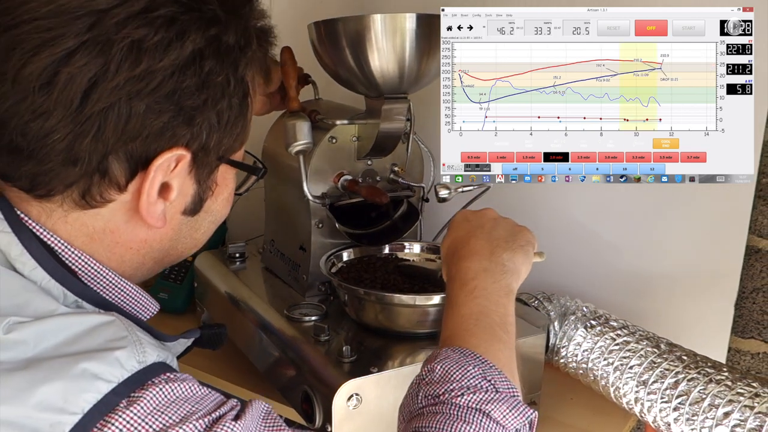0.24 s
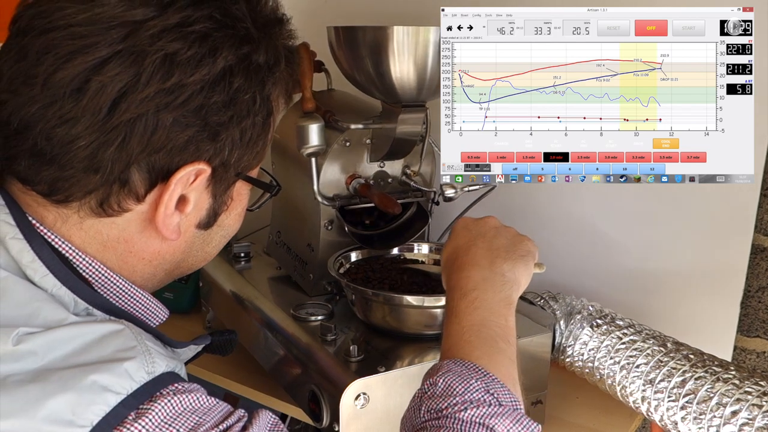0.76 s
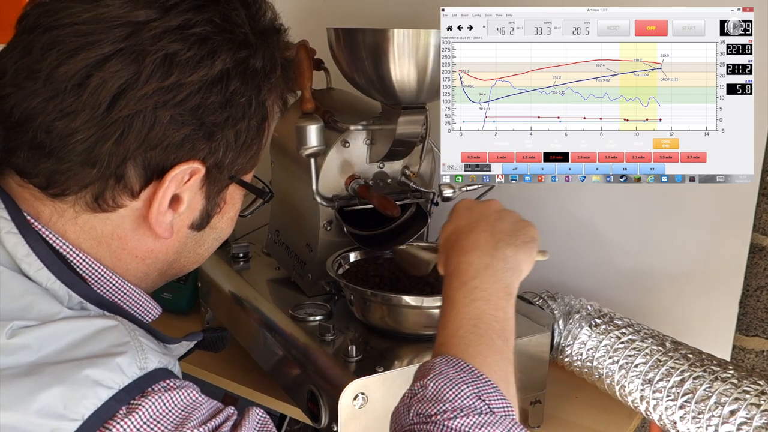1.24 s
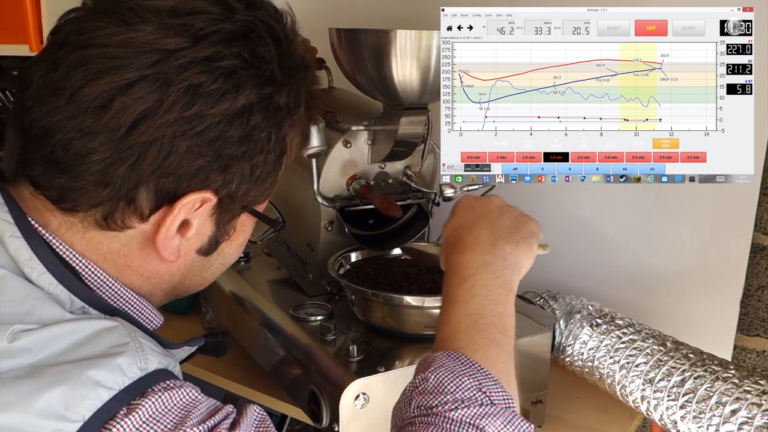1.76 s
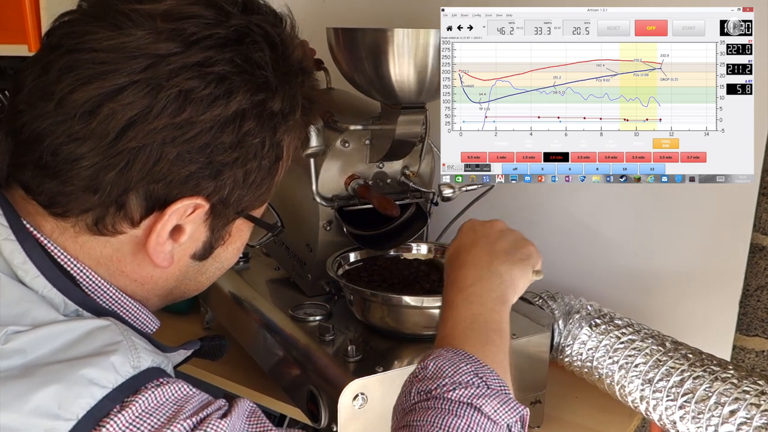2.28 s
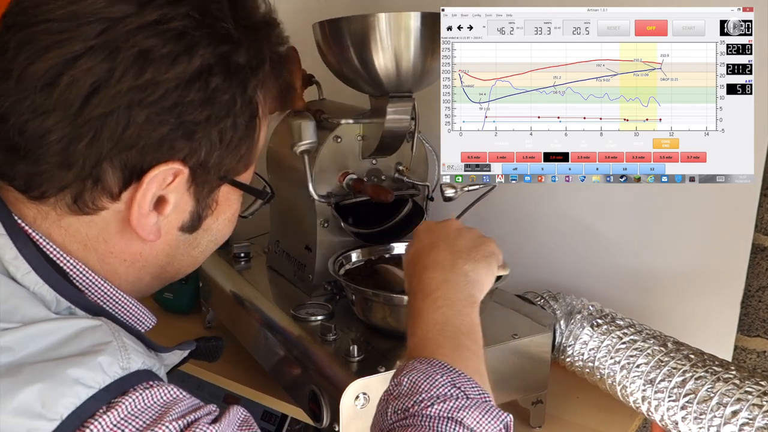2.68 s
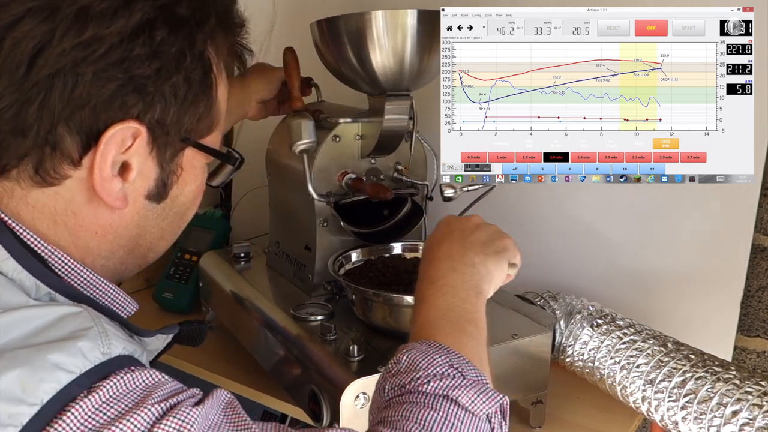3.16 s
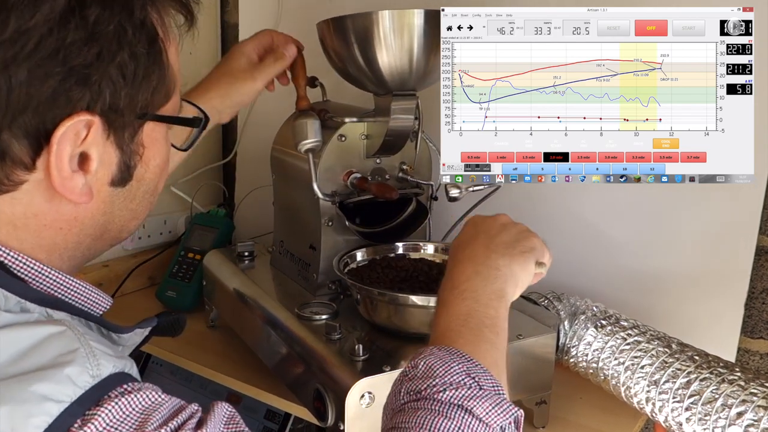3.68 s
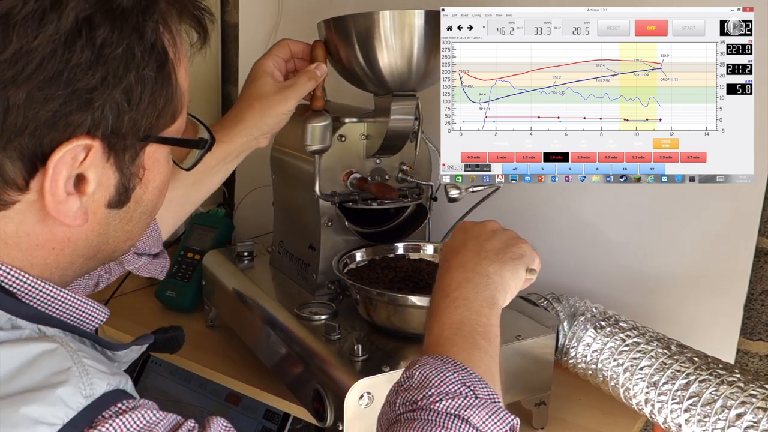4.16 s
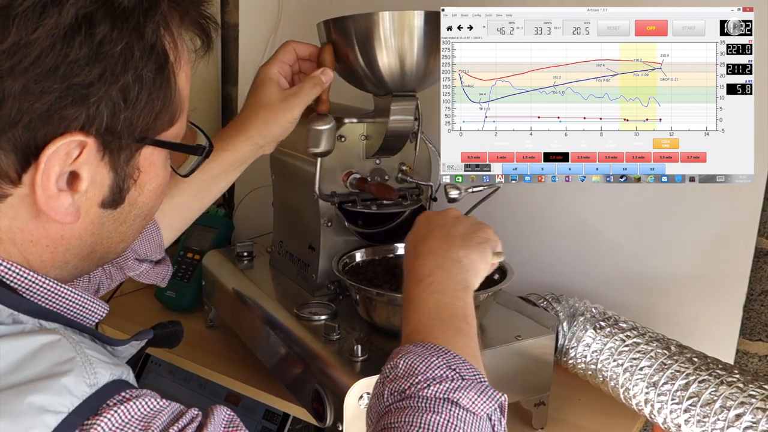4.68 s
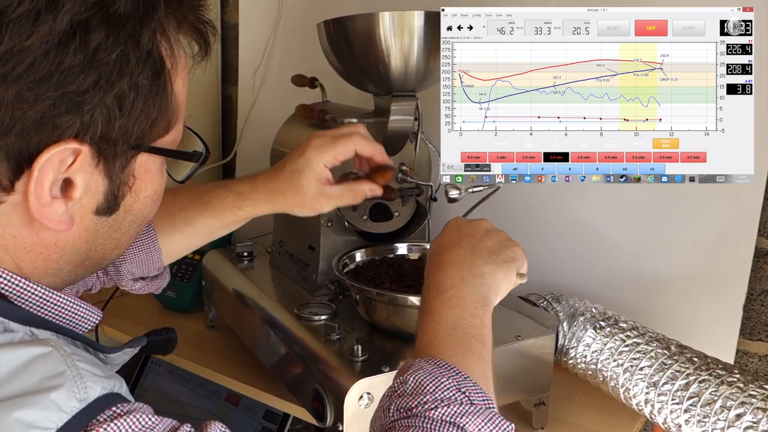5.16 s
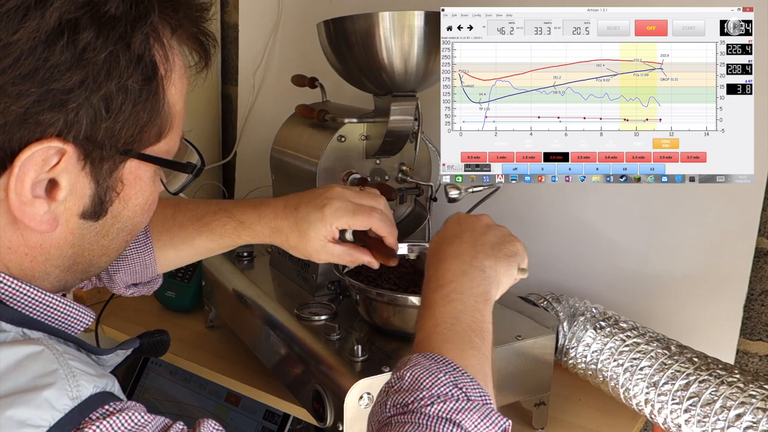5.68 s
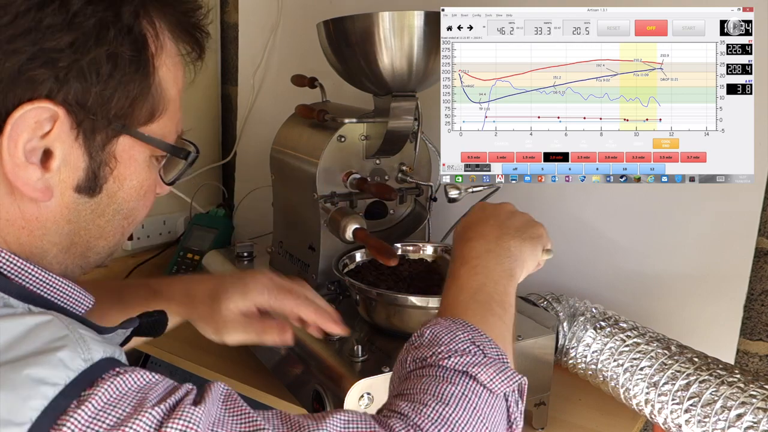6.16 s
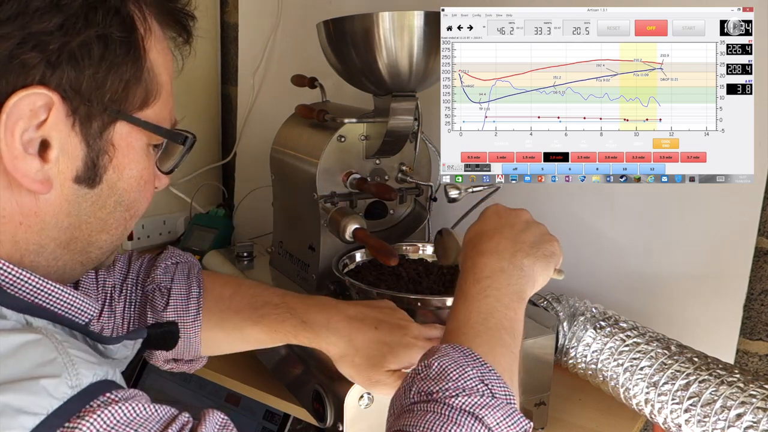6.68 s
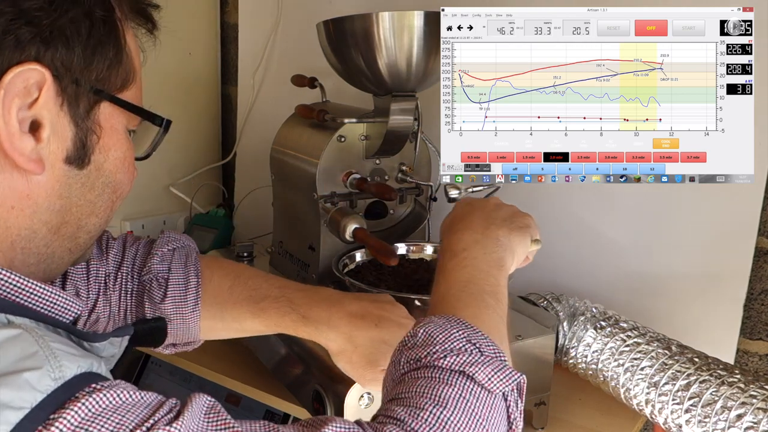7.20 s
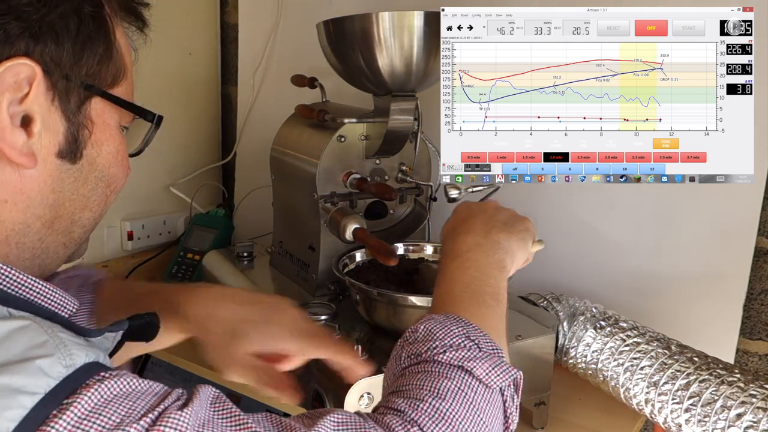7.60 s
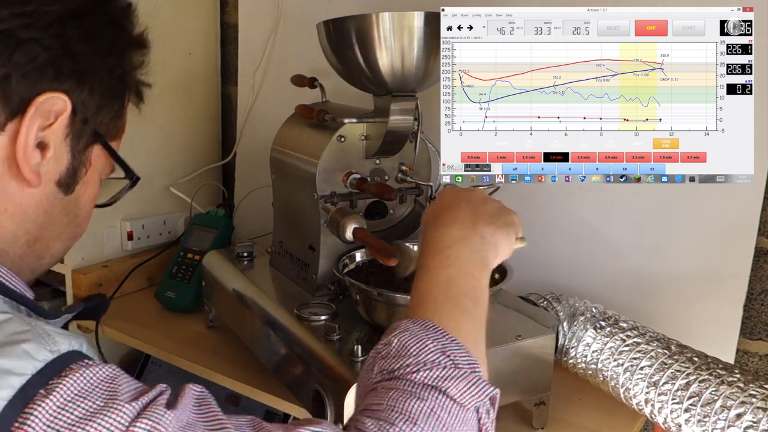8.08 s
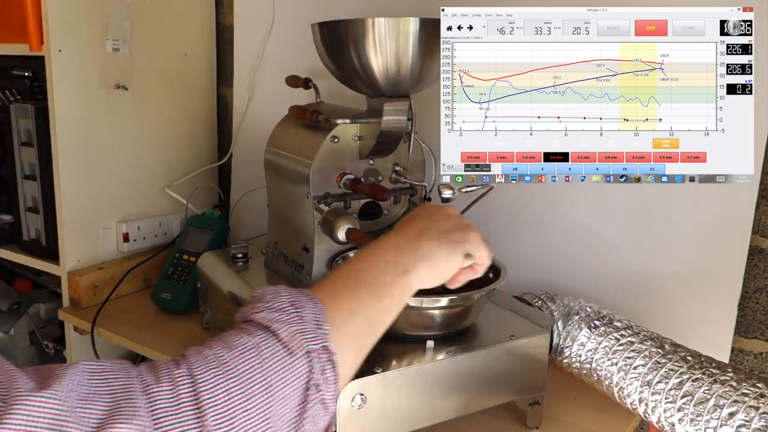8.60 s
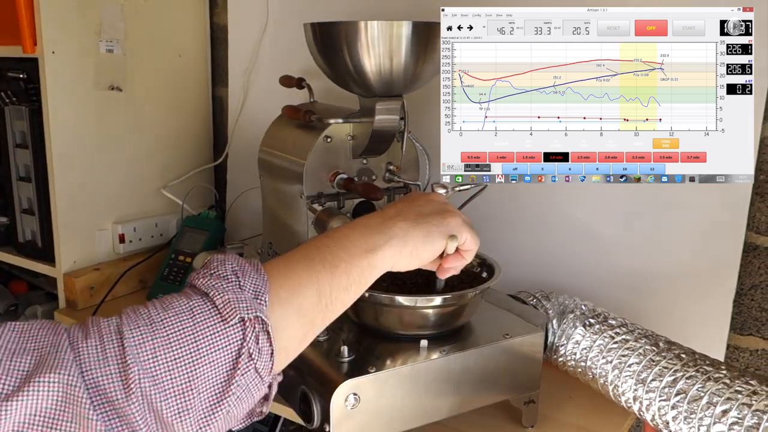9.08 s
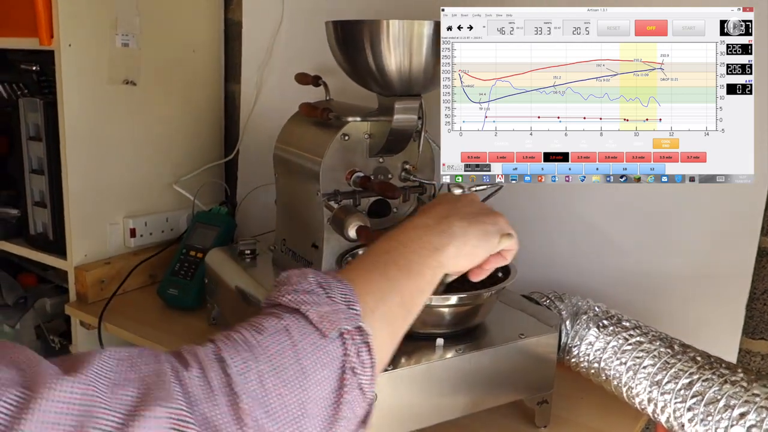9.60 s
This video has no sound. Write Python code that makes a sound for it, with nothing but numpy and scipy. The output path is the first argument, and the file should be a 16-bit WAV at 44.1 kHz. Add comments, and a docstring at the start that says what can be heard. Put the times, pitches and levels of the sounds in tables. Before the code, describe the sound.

Fans whine and rush steadily while the last roasted beans clink in a steel drum, then hand strokes swish beans around a ringing metal bowl.

```python
"""Fans whine and rush throughout, as noise through duct resonances under fluttering tones.
At first the last roasted beans rattle and clink in a small roaster's steel drum, as short ringing impacts.
Hand strokes then stir beans in the steel cooling bowl: dry hiss, ringing wall hits and sliding trickles.
Ticks, scuffs, knocks, bumps and switch clicks are shaped noise bursts; a handle chirps once.
All but the fans is answered by a small room."""
import sys
import numpy as np
from scipy import signal
from scipy.fft import rfft, irfft, next_fast_len
from scipy.io import wavfile
from scipy.ndimage import map_coordinates

SR = 44100
rng = np.random.default_rng(int(sys.argv[2]) if len(sys.argv) > 2 else 0)


def output_pcm(signal):
    """Save a mono or channel-first signal as 16-bit PCM at the path in sys.argv[1].

    Samples are clipped to [-1, 1] before scaling.
    """
    pcm = np.clip(np.atleast_2d(signal).T, -1, 1) * 32767
    wavfile.write(sys.argv[1], SR, np.round(pcm).astype(np.int16))


N = 433944


def amp(db):
    """Decibels to gain."""
    return np.exp(np.asarray(db) * (np.log(10) / 20))


def unit(x):
    """Scale to rms 1."""
    return x / np.sqrt(np.mean(x ** 2) + 1e-20)


def clock():
    """Time of each sample in seconds."""
    return np.arange(N) / SR


def along(points, hz):
    """(Hz, value) points read on a log frequency axis."""
    f, v = np.transpose(points)
    return np.interp(np.log(hz + 1), np.log(f + 1), v)


def curves(rows):
    """One value per sample for each column after the time."""
    s, *cols = np.transpose(rows)
    return [np.interp(clock(), s, c) for c in cols]


def wobble(rate):
    """Smooth random curve, rate knots a second."""
    knots = rng.standard_normal(int(N * rate / SR) + 4)
    coarse = clock()[::64]
    return np.interp(clock(), coarse, map_coordinates(knots, [coarse * rate]))


def during(start, end, fade):
    """1 between two times, 0 outside, with soft edges."""
    t = clock()
    return np.clip(np.minimum(t - start, end - t) / fade + .5, 0, 1)


def swell(s, rise, fall):
    """Peak at time s, 20 dB lower one rise before and one fall after."""
    first, last = np.clip([int((s - 3 * rise) * SR), int((s + 3 * fall) * SR)], 0, N)
    t = np.arange(first, last) / SR - s
    out = np.zeros(N)
    out[first:last] = amp(-20 * np.maximum(-t / rise, t / fall))
    return out


def filtered(x, response):
    """x times a response of frequency."""
    m = 2 * next_fast_len(N // 2 + SR // 8)
    return irfft(rfft(x, m) * response(np.fft.rfftfreq(m, 1 / SR)), m)[..., :N]


def body(x, spectrum, modes=(), size=8192):
    """Causal (minimum-phase) body with a broad colour and resonances; white input keeps its power."""
    hz = np.fft.rfftfreq(size, 1 / SR)
    peaks = sum((amp(2 * db) - 1) / (1 + (2 * (hz - f) / w) ** 2) ** 2 for f, w, db in modes)
    gain = amp(along(spectrum, hz)) * np.sqrt(np.maximum(1 + peaks, 1e-3))
    cepstrum = irfft(np.log(gain))
    cepstrum[1:size // 2] *= 2
    cepstrum[size // 2 + 1:] = 0
    ring = irfft(np.exp(rfft(cepstrum)))
    return signal.oaconvolve(x, ring[None] / np.linalg.norm(ring), axes=1)[:, :N]


def puffs(level, width):
    """Partly alike stereo noise following a level curve."""
    mid, side = rng.standard_normal((2, N))
    return level * unit(np.array([mid + width * side, mid - width * side]))


def impacts(level, rate, scatter_db, t60, spread, top_hz=11400):
    """Stereo bean impacts along a level curve: a higher level gives more and stronger ones."""
    # rate is impacts per second at -30 dB
    density = np.clip(rate * level / amp(-30), 20, 9000) / SR
    at = np.flatnonzero(rng.random(N) < density)
    force, side, lag = rng.standard_normal((len(at), 3)).T
    hz = rng.uniform(800, top_hz, len(at))
    # each impact is a short ring at its own pitch
    t = np.arange(int(min(t60, .06) * SR * 2 / 3)) / SR
    ring = amp(-60 * t / t60) * np.sin(2 * np.pi * hz[:, None] * t)
    force = unit(amp(scatter_db * np.clip(force, -2, 2))) * level[at] / np.sqrt(density[at])
    sign = rng.choice([-1, 1], len(at))
    ring *= (force * sign / np.linalg.norm(ring, axis=1))[:, None]
    # each landing place gives its own delay (samples) and strength per ear
    out = []
    for ear in (-1, 1):
        delay = np.rint(ear * (spread * lag - .2)).astype(int)
        start = np.maximum(at + delay, 0)
        index = (start[:, None] + np.arange(len(t))).ravel()
        heard = (ring * amp(ear * side)[:, None]).ravel()
        out.append(np.bincount(index, heard, N)[:N])
    return np.array(out)


def add(out, s, hz, db, t60):
    """Add one ringing steel mode to out, struck at time s."""
    rest = out[int(s * SR):][:SR // 3]
    t = np.arange(len(rest)) / SR
    onset = 1 - np.exp(-t / 0.0011)
    rest += amp(db - 60 * t / t60) * onset * np.sin(2 * np.pi * hz * t)


def blade_tone(hz, db):
    """A fan's tone; turbulence makes its phase and level flutter."""
    phase = 2 * np.pi * np.cumsum(hz + 1.2 * wobble(2.5)) / SR + .25 * wobble(18)
    return amp(db + 1.45 * wobble(11)) * np.sqrt(2) * np.sin(phase)


# Blade tones before load, hunting and flutter: main in Hz, second in Hz.
BLADE_TONES_HZ = (736.5, 1338.5)
# Second tone's mean level. Each row: time in seconds, level in dB.
SECOND_TONE_LEVELS = [(0, -46.5), (1.3, -39.5), (2.8, -43), (4.2, -40), (5.4, -45.5), (6.2, -38),
                      (7.3, -39.5), (8.3, -39), (9.84, -39)]
# Weaker motor and blade tones. Each row: frequency in Hz, rms level in dB, flutter in knots per second.
MOTOR_HUMS = [(105, -71, 18), (333, -62, 10), (419.8, -52.5, 8), (667.5, -49, 9), (1141, -54, 14),
              (1467, -46, 14), (2207, -55, 7), (2396, -57, 12)]
# Faint thin whistle: start in seconds, end in seconds, mean frequency in Hz, mean peak level in dB.
WHISTLE_TONE = (1.9, 2.5, 6665, -48)
# Colour of the rush. Each row: frequency in Hz, relative level in dB per Hz.
AIR_SPECTRUM = [(20, -40), (75, -36), (170, -20.5), (300, -11), (540, -4.5), (640, 2), (950, -2.5),
                (1450, 0.5), (1720, -5.5), (2100, -1), (3500, -2.5), (6000, -7.5), (8500, -14.5),
                (11000, -16)]
# Duct resonances. Each row: frequency in Hz, width in Hz, lift in dB.
DUCT_RESONANCES = [(172.6, 26.5, 10.5), (613, 25, 3.5), (770, 101, 6.5), (950, 70, -1), (1087, 220, 6),
                   (1522, 122, 6), (2480, 41, 2.5), (2590, 33, 7.5), (3256, 60, 6.5)]
# Left-right likeness of the air noise. Each row: frequency in Hz, correlation (no unit).
AIR_LIKENESS = [(60, 0.63), (130, 1), (270, 0.95), (580, 0.95), (1230, 0.91), (2600, 0.65), (5540, 0.43),
                (11800, 0.24)]
AIR_DB, AIR_RISE_DB_PER_S = -29.5, 0.0855
# the main tone gets louder, and both tones rise in pitch, when the fan takes more load
MAIN_DB, LOAD_STEP_DB, LOAD_STEP_HZ, LOAD_FROM_S, LOAD_RAMP_S = -37.5, 3.5, 2, 7.0, 0.86
# the second tone hunts by +-HUNT_HZ and +-HUNT_DB, louder at the top
HUNT_PERIOD_S, HUNT_TOP_S, HUNT_HZ, HUNT_DB = .984, 1.3, 5.1, 2


def fans():
    """Air rushes through the duct under a steady blade tone, a hunting one, motor hums and a whistle."""
    def response(hz):
        turn = np.arccos(np.clip(along(AIR_LIKENESS, hz), -1, 1)) / 2
        return np.array([np.cos(turn), np.sin(turn)])

    mid, side = filtered(rng.standard_normal((2, N)), response)
    air_level = amp(AIR_DB + AIR_RISE_DB_PER_S * clock() + 0.99 * wobble(1.436))
    rush = unit(body(np.array([mid + side, mid - side]), AIR_SPECTRUM, DUCT_RESONANCES))
    load = np.clip((clock() - LOAD_FROM_S) / LOAD_RAMP_S, 0, 1)
    hunt = np.cos(2 * np.pi * (clock() - HUNT_TOP_S) / HUNT_PERIOD_S)
    main_hz, second_hz = [hz + LOAD_STEP_HZ * load for hz in BLADE_TONES_HZ]
    second_db = curves(SECOND_TONE_LEVELS)[0] + HUNT_DB * hunt
    tones = blade_tone(main_hz, MAIN_DB + LOAD_STEP_DB * load)
    tones += blade_tone(second_hz + HUNT_HZ * hunt, second_db)
    for hz, db, flutter in MOTOR_HUMS:
        phase = 2 * np.pi * hz * clock()
        hum = (1 + wobble(flutter)) * np.sin(phase) + wobble(flutter) * np.cos(phase)
        tones += amp(db) * unit(hum)
    start, end, hz, db = WHISTLE_TONE
    whistle_level = during(start, end, fade=.2) * amp(db + 2 * wobble(14))
    tones += whistle_level * np.sin(2 * np.pi * np.cumsum(hz + 6 * wobble(17)) / SR)
    return air_level * rush + tones


POUR_DB, POUR_ENDS_S, POUR_FADE_DB_PER_S, POUR_CLUMP_DB = -29.5, .8, 21.5, 1.78


def pour_db(t):
    """The flow of beans out of the drum holds, then dies away."""
    return POUR_DB - POUR_FADE_DB_PER_S * np.maximum(t - POUR_ENDS_S, 0)


# Drum colour. Each row: frequency in Hz, relative level in dB per Hz.
DRUM_SPECTRUM = [(300, -72), (1700, -3.5), (2500, -2.5), (5000, 1), (8000, -1.5), (11000, 2)]
# Drum resonances, lowest first. Each row: frequency in Hz, width in Hz, lift in dB.
DRUM_RESONANCES = [(2390, 90, 12), (2620, 60, 8), (2850, 60, 8), (3970, 90, 3), (4940, 260, 5),
                   (5980, 60, 7), (6970, 60, 6), (7970, 80, 5)]


def drum():
    """The last beans strike the steel drum one by one: dry rattle and longer, lower clinks."""
    level = amp(pour_db(clock()) + POUR_CLUMP_DB * wobble(16))
    rattle = impacts(amp(-1.5) * level, rate=1400, scatter_db=-0.5, t60=0.00057, spread=0.56)
    clinks = impacts(amp(-3.5) * level, rate=480, scatter_db=3, t60=.04, spread=.6, top_hz=9000)
    return body(rattle + clinks, DRUM_SPECTRUM, DRUM_RESONANCES)


# Heavy clumps in the drum. Each row: time in seconds, level in dB before mode weights and scatter.
DRUM_CLANGS = [(.066, -23.5), (.225, -26), (.487, -27), (.6, -30), (.84, -30), (1.156, -30)]
CLANG_T60_S = 0.21
# PING_DB is relative to the pour, for the weakest hit on the lowest mode; higher modes are weaker
PINGS_PER_S, PING_DB, PING_T60_S, PING_TILT_DB_PER_OCTAVE = 34, -6, .1, -2


def pings(count=52, order=3):
    """Single beans catch one drum mode squarely; heavy clumps ring its lowest modes together."""
    out = np.zeros(N)
    lowest_hz, _, lowest_db = DRUM_RESONANCES[0]
    for k, (when, which, detune, force) in enumerate(rng.random((count, 4))):
        s = (k + when) / PINGS_PER_S
        hz, width, _ = DRUM_RESONANCES[int(which * len(DRUM_RESONANCES))]
        tilt_db = PING_TILT_DB_PER_OCTAVE * np.log2(hz / lowest_hz)
        db = pour_db(s) + PING_DB + 10 * force + tilt_db
        add(out, s, hz + 2 * width * (detune - .5), db, PING_T60_S)
    for s, db in DRUM_CLANGS:
        for hz, width, lift_db in DRUM_RESONANCES[:order]:
            mode_hz = hz + width * rng.normal(0, 0.13)
            mode_db = db + 1.6 * (lift_db - lowest_db) + rng.normal(0, 1.5)
            add(out, s, mode_hz, mode_db, CLANG_T60_S)
    return out


# Spoon sweeps. Each row: peak in seconds, level in dB, rise in seconds, share thrown on the wall (0-1).
SPOON_STROKES = [(1.1, -28.5, 0.14, .2), (1.605, -27, 0.049, .1), (1.93, -22.5, 0.065, 0.27),
                 (2.285, -19.5, 0.036, 0.93), (2.70, -28, .14, 0.26), (2.995, -14.5, 0.058, 0.81),
                 (3.16, -27.5, 0.14, 0.56), (3.44, -21.5, .075, 0.37), (3.682, -14, .027, 0.96),
                 (4.283, -24.5, 0.078, 0.83), (4.4, -29, .1, 0.43), (4.76, -30, .09, 0.21),
                 (4.96, -14.5, .045, .95), (5.505, -19, .17, .9), (5.642, -23.5, 0.059, 0.08),
                 (6.166, -18, .04, 0.82), (7.035, -29, .05, .8), (7.15, -28.5, .17, .15),
                 (7.635, -26, 0.13, 0.52), (7.765, -26, 0.1, 0.57), (7.88, -22, 0.069, .9),
                 (7.93, -25, .04, .4), (8.275, -25, .17, 0.31), (8.548, -16.5, 0.048, 0.91),
                 (9.11, -29.5, 0.16, 0.66), (9.28, -27.5, .17, 0.13), (9.62, -27, .13, 0.38)]
# The spoon lies still. Each row: start in seconds, end in seconds.
SPOON_RESTS = [(3.9, 4.2), (6.3, 6.95)]
# Colour of bean on bean. Each row: frequency in Hz, relative level in dB per Hz.
BEAN_SPECTRUM = [(200, -37), (1000, -15.5), (2000, 1.5), (4500, 8), (8000, 7), (11000, 0.5)]
# Colour of bean on bowl wall. Each row: frequency in Hz, relative level in dB per Hz.
WALL_SPECTRUM = [(300, -56), (1600, -11), (3000, -12.5), (4400, -7.5), (6200, -2), (7200, 6.5), (8400, 2),
                 (11000, -6.5)]
# Bowl resonances. Each row: frequency in Hz, width in Hz, lift in dB.
BOWL_RESONANCES = [(1850, 90, 9), (2500, 120, 6), (3460, 100, 16.5), (4100, 70, 16), (4690, 90, 10),
                   (4945, 85, 15), (5640, 170, 10.5), (6520, 190, 4.5), (7010, 110, 4), (7340, 150, 6),
                   (7710, 130, 5), (8700, 110, 5), (10100, 100, 5)]
SETTLE_S, SETTLE_PER_RISE = .07, .25  # thrown beans fall 20 dB in this time, longer after a slow sweep
TRICKLE_DB, TRICKLE_S = -13, .28  # beans slide back down the wall: level re the throw, time to fall 20 dB
SHUFFLE_DB, SHUFFLE_SWING_DB = -42.5, 3  # beans shift round the moving spoon between sweeps
CRACKLE_DB = -49  # stray beans snap against each other while the spoon moves


def stirring():
    """Beans rub on each other with a dry hiss, pelt the bowl's wall, which rings, and trickle back."""
    moving = 1 - sum(during(start, end, fade=.1) for start, end in SPOON_RESTS)
    # powers
    on_wall = np.zeros(N)
    on_beans = (moving * amp(SHUFFLE_DB + SHUFFLE_SWING_DB * wobble(5))) ** 2
    for s, db, rise, share in SPOON_STROKES:
        share = np.clip(share, 0, 1)
        throw = (amp(db) * swell(s, rise, SETTLE_S + SETTLE_PER_RISE * rise)) ** 2
        trickle = share * (amp(db + TRICKLE_DB) * swell(s, rise, TRICKLE_S)) ** 2
        on_wall += share * throw + trickle / 2
        on_beans += (1 - share) * throw + trickle / 2
    clumps = amp(.9 * wobble(170))
    hiss = impacts(np.sqrt(on_beans) * clumps, rate=3200, scatter_db=-1.5, t60=0.00084, spread=0.71)
    snaps = impacts(amp(CRACKLE_DB) * moving, rate=250, scatter_db=6.5, t60=0.0036, spread=0.65)
    steel = impacts(np.sqrt(on_wall) * clumps, rate=1500, scatter_db=3.0, t60=0.0044, spread=.55)
    among_beans = amp(-1.0) * body(hiss + snaps, BEAN_SPECTRUM)
    return among_beans + amp(-2.64) * body(steel, WALL_SPECTRUM, BOWL_RESONANCES)


# Sharpest single contacts of beans and spoon. Each row: time in seconds, level in dB before path gains.
SHARP_TICKS = [(0.068, -18), (.4045, -20), (.4843, -18), (.529, -20.5), (1.1537, -22), (2.243, -18),
               (3.6524, -13.5), (3.739, -18), (3.831, -21.5), (5.0375, -20), (7.525, -21.5), (9.012, -22),
               (9.158, -22.5), (9.8059, -24)]


def ticks():
    """A hard contact sets off a few milliseconds of chatter, among the beans and on the wall."""
    level = sum(amp(db) * swell(s + 0.00045, 0.00095, 0.016) for s, db in SHARP_TICKS)
    among_beans = amp(-3) * body(puffs(level, width=0.49), BEAN_SPECTRUM)
    on_wall = amp(-2.5) * body(puffs(level, width=0.59), WALL_SPECTRUM, BOWL_RESONANCES)
    return among_beans + on_wall


# RING_DB is re the stroke, before wall share, mode weight and scatter
RING_DB, RING_T60_S, RING_SCATTER_S = -9, .14, .012


def bowl_ring():
    """Each throw of beans strikes the bowl's clearest modes, which ring on briefly."""
    out = np.zeros(N)
    strongest_db = max(lift_db for _, _, lift_db in BOWL_RESONANCES)
    for s, db, _, share in SPOON_STROKES:
        share_db = 20 * np.log10(np.clip(share, .01, 1))
        for hz, width, lift_db in BOWL_RESONANCES[2:7]:
            late, detune, force = rng.standard_normal(3)
            mode_db = db + RING_DB + share_db + (lift_db - strongest_db) / 2 + 2 * force
            add(out, s + RING_SCATTER_S * late, hz + 0.17 * width * detune, mode_db, RING_T60_S)
    return out


# Sleeve and hand scuffs on the housing. Each row: peak in seconds, level in dB,
# rise over 20 dB in seconds, fall over 20 dB in seconds.
HOUSING_SCUFFS = [(2.80, -25.5, 0.031, 0.034), (7.26, -25.5, 0.1, 0.052)]
# Catches and switches. Each row: time in seconds, click level in dB, housing knock level in dB,
# time to fall 40 dB in seconds.
CATCH_CLICKS = [(6.8875, -14.5, -24.5, 0.036), (7, -15.5, -21, 0.053), (7.311, -32, -17, 0.056)]
# Click colour. Each row: frequency in Hz, relative level in dB per Hz.
CATCH_SPECTRUM = [(60, -45), (300, -27.5), (2000, -4), (4000, -2), (8000, 1), (10500, 6), (12000, -3)]
# Housing colour. Each row: frequency in Hz, relative level in dB per Hz.
HOUSING_SPECTRUM = [(40, -45), (100, -30), (200, -14), (700, -5), (1350, -0.5), (2200, -2.5), (4000, -7),
                    (10000, -14)]
# Housing resonances. Each row: frequency in Hz, width in Hz, lift in dB.
HOUSING_RESONANCES = [(741, 49, 3.3), (1340, 110, 3.6), (1860, 130, 3.2), (2200, 140, 4.6), (4080, 200, 4)]


def controls():
    """Catches snap brightly and knock the sheet-metal housing; a sleeve and hand scuff over it."""
    snap = sum(amp(db) * swell(s + 0.0016, 0.0025, t40 / 2) for s, db, _, t40 in CATCH_CLICKS)
    knock = sum(amp(db) * swell(s + 0.0028, 0.0018, t40 / 2) for s, _, db, t40 in CATCH_CLICKS)
    scuff = sum(amp(db) * swell(s, rise, fall) for s, db, rise, fall in HOUSING_SCUFFS)
    bright = body(puffs(snap, width=0.72), CATCH_SPECTRUM)
    return bright + body(puffs(knock + scuff, width=0.13), HOUSING_SPECTRUM, HOUSING_RESONANCES)


# Dull bench contacts. Each row: peak in seconds, level in dB, rise over 20 dB in seconds,
# fall over 20 dB in seconds.
BENCH_BUMPS = [(2.803, -33, .02, 0.055), (2.95, -39.5, 0.039, 0.071), (3.425, -40, .04, 0.13),
               (7.275, -40, 0.05, 0.066), (8.66, -43.5, 0.069, 0.095)]
# Bench colour. Each row: frequency in Hz, relative level in dB per Hz.
BENCH_SPECTRUM = [(30, -48), (60, -30), (110, -9.5), (200, 4), (380, 3), (520, -6), (1500, -30)]


def bumps():
    """Soft contacts with the wooden bench, as low noise bursts."""
    level = sum(amp(db) * swell(s, rise, fall) for s, db, rise, fall in BENCH_BUMPS)
    return body(puffs(level, width=0.053), BENCH_SPECTRUM)


# Handle slip: start in seconds, length in seconds.
SLIP_TIME = (5.9012, .0075)
# Its chirp: first frequency in Hz, last frequency in Hz, level in dB before the tone and noise gains.
SLIP_CHIRP = (7200, 5900, -15)


def squeak():
    """A metal handle slips in one tiny, rough, falling chirp with noise."""
    s, length = SLIP_TIME
    first_hz, last_hz, db = SLIP_CHIRP
    u = np.clip((clock() - s) / length, 0, 1)
    hz = (first_hz + (last_hz - first_hz) * np.sqrt(u)) * (1 + .09 * wobble(1500))
    tone = np.sqrt(2) * np.sin(2 * np.pi * np.cumsum(hz) / SR)
    grip = amp(db) * np.sqrt(4 * u * (1 - u))
    return .8 * grip * tone + body(puffs(.75 * grip, width=.6), BEAN_SPECTRUM)


def room(x, t60):
    """Close walls answer with a short diffuse tail, from 3 ms on."""
    t = np.arange(SR // 2) / SR
    tail = rng.standard_normal((2, len(t))) * amp(-60 * t / t60) * (t > .003)
    return signal.oaconvolve(x, tail / np.linalg.norm(tail[0]), axes=1)[:, :N]


def scene():
    """Beans and handling in the room, over the fans."""
    near = stirring() + bowl_ring() + drum() + pings() + ticks() + controls() + bumps()
    slip = squeak()
    answer = room(amp(-6.5) * near + amp(-5) * slip, t60=0.098)
    return near + slip + answer + fans()


TOP_HZ = 11150  # 10 dB down here


def record(dry):
    """Steep treble cut: 1 dB per 10 Hz from 100 Hz below TOP_HZ, down to -120 dB."""
    return filtered(dry, lambda hz: amp(-np.clip((hz - TOP_HZ + 100) / 10, 0, 120)))


dry = scene()
out = record(dry)
output_pcm(out)
```